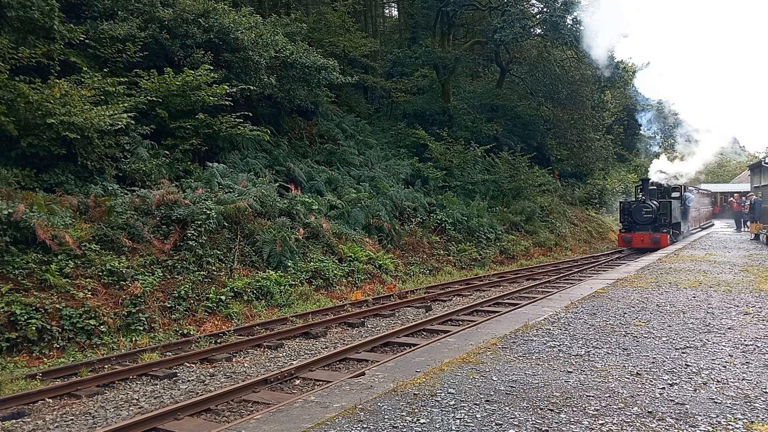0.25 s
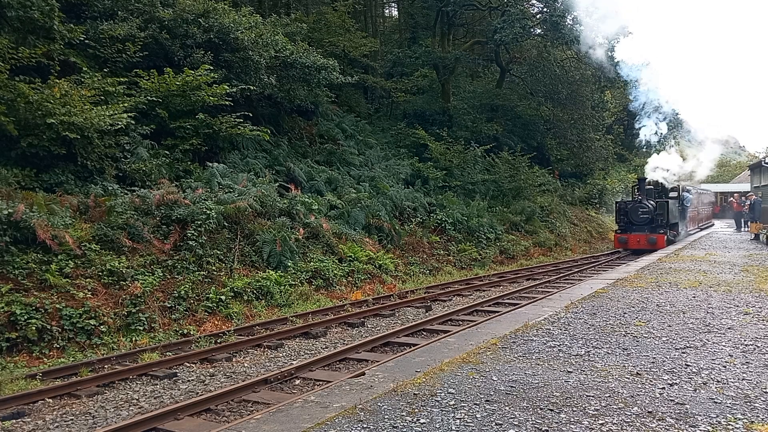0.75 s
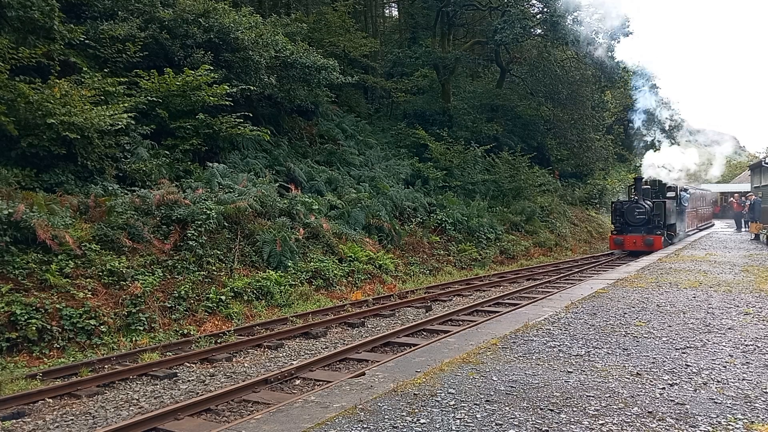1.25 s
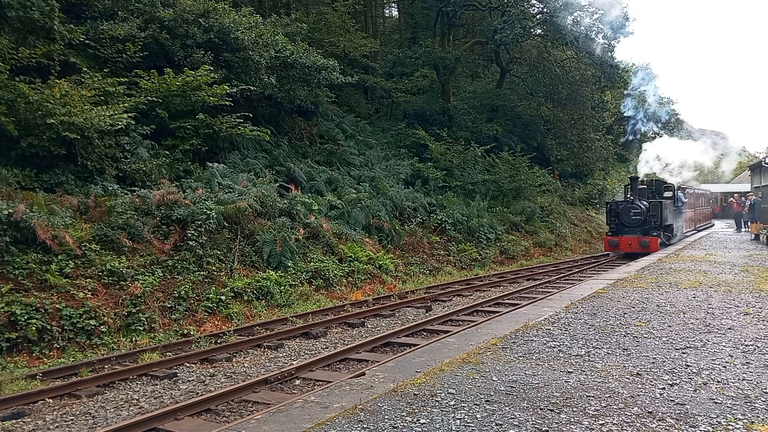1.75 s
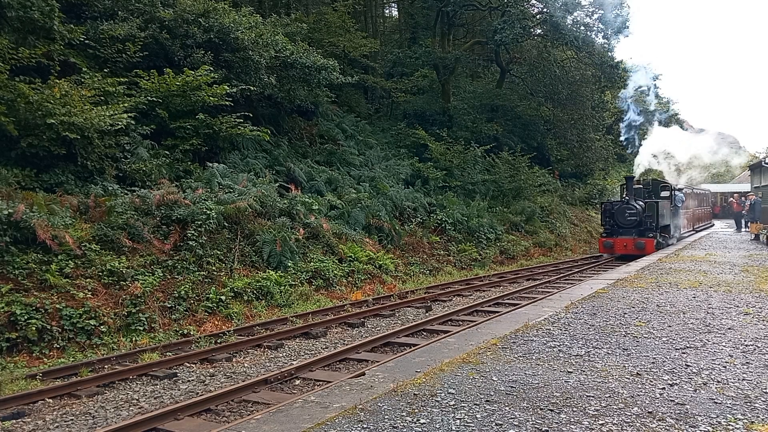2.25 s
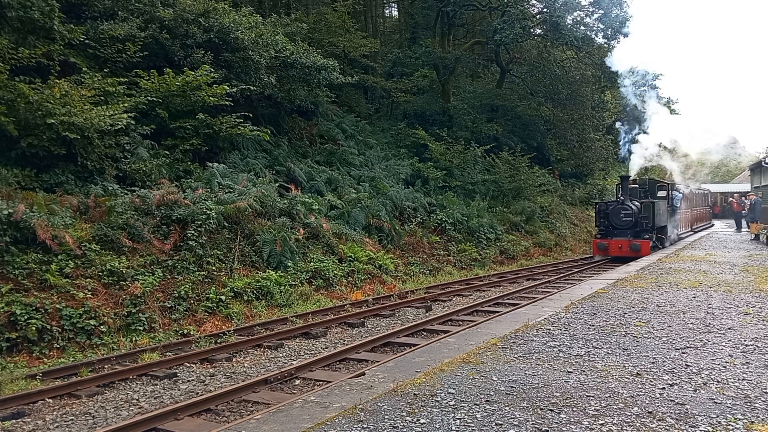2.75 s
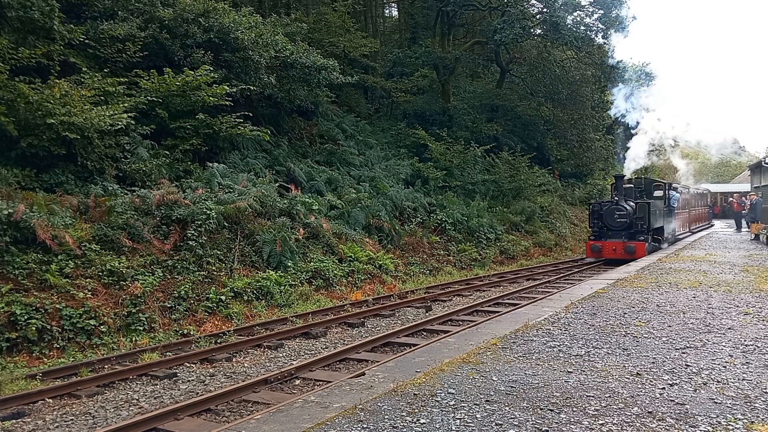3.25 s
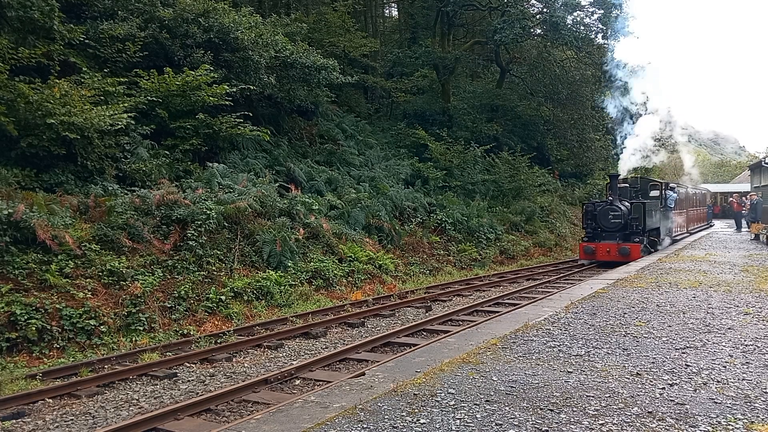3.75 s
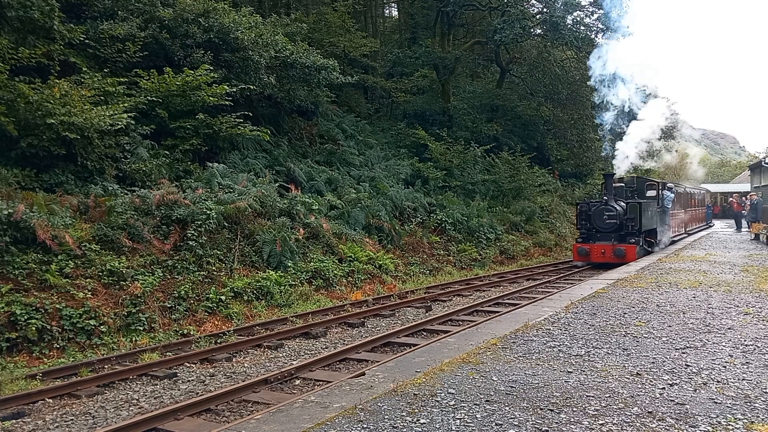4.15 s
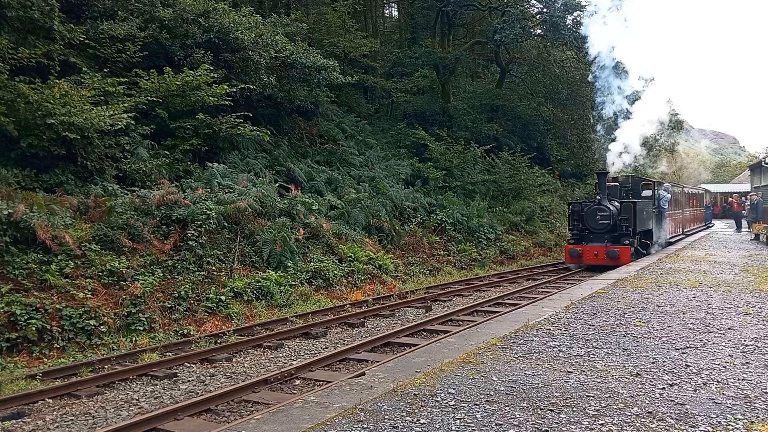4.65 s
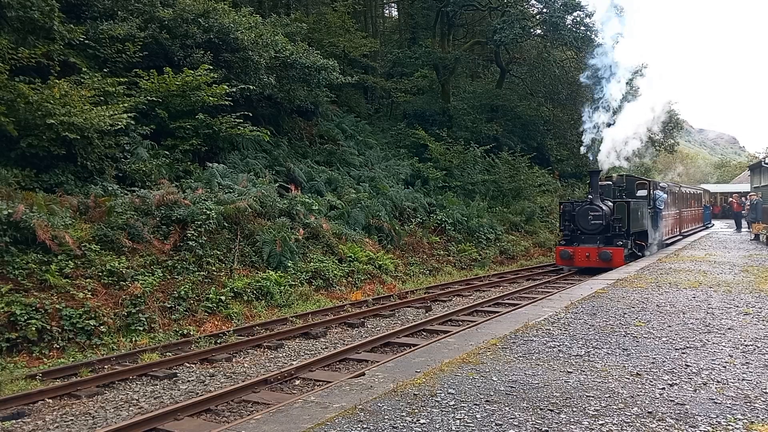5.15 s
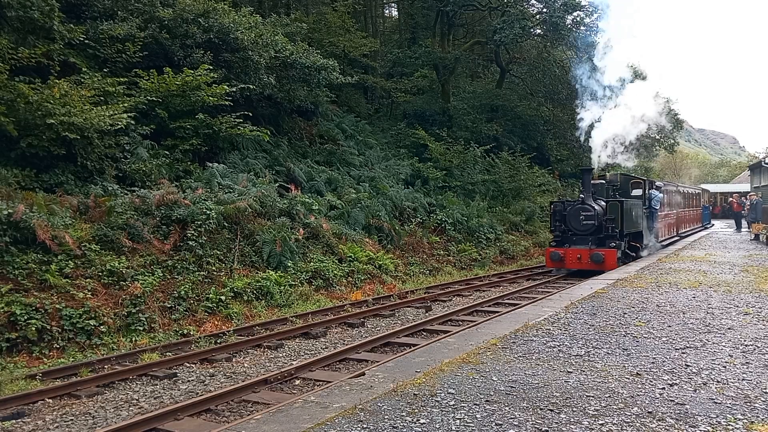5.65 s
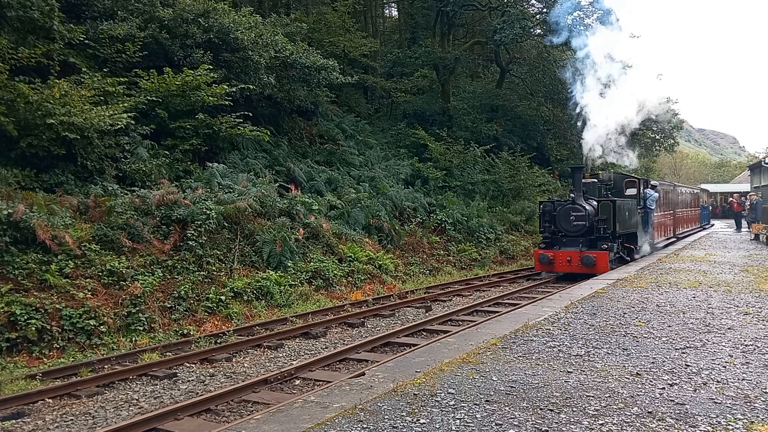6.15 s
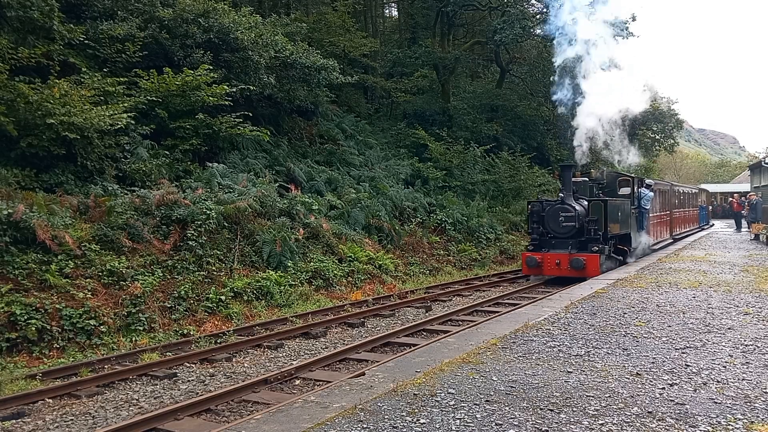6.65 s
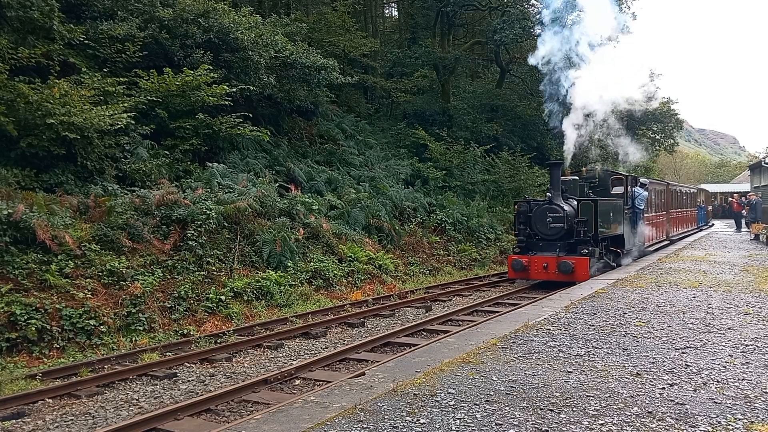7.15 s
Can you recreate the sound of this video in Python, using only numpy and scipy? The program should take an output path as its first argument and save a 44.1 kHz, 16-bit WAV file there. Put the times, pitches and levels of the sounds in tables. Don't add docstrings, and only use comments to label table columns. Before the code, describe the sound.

Outdoors beside the track, a stereo camera microphone hears an approaching small locomotive. Each exhaust beat is a short, rough puff with a low chimney resonance and a woody, diffuse echo. The rhythm tightens steadily as the train gains speed. Underneath lie wheel rumble, draught hum and blower roar; above, thin sizzling and slightly whistling steam leaks. Faint squeaks come first, then soft bassy thumps and brief bright steam spurts.

```python
import sys
import numpy as np
from scipy import signal
from scipy.fft import rfft, irfft, next_fast_len
from scipy.io import wavfile
from scipy.ndimage import uniform_filter1d, map_coordinates

SR = 44100
rng = np.random.default_rng(int(sys.argv[2]) if len(sys.argv) > 2 else 0)


def makeup_ratio(level_db):
    decades = np.asarray(level_db, float) / 20
    return 10 ** decades


def unload_audio(sound):
    columns = np.transpose(np.atleast_2d(sound))
    steps = np.round(np.clip(columns, -1, 1) * 32767)
    wavfile.write(sys.argv[1], SR, steps.astype(np.int16))


N = 325899

# f/Hz, level/dB
SPRAY = [(1200, -24), (1700, 0.5), (2300, 1.5), (3500, -0.5), (5000, -6), (7500, -8), (8500, -19),
         (11000, -26), (15000, -28)]


def unit(x):
    return x / np.sqrt(np.mean(x ** 2, axis=-1, keepdims=True) + 1e-20)


def along(points, hz):
    f, v = np.transpose(points)
    return np.interp(np.log(hz + 1), np.log(f + 1), v)


def wobble(rate):
    knots = rng.standard_normal(int(N * rate / SR) + 4)
    return map_coordinates(knots, [np.arange(N) * rate / SR])


def filtered(x, response):
    n = x.shape[-1]
    m = next_fast_len(n + 4096)
    return irfft(rfft(x, m) * response(np.fft.rfftfreq(m, 1 / SR)), m)[..., :n]


def mode(hz, width):
    return lambda f: (1j * f * width / (hz * hz - f * f + 1j * f * width)) ** 2


def shape(points):
    closed = [(points[0][0] / 2, -120), *points, (points[-1][0] * 2, -120)]
    return lambda f: makeup_ratio(along(closed, f))


def rush(response, patchy_db):
    z = signal.stft(rng.standard_normal((2, N)), nperseg=512)[2]
    field = uniform_filter1d(rng.standard_normal(z.shape[1:]), size=5, axis=0)
    field = uniform_filter1d(field, size=10, axis=1)
    noise = signal.istft(z * makeup_ratio(patchy_db * unit(field)), nperseg=512)[1][:, :N]
    return unit(filtered(noise, response))


def nearness(s):
    start_m, speed_m_s, gain_m_s2 = 45.5, 2.75, 0.15
    return -20 * np.log10(1 - (speed_m_s * s + gain_m_s2 * s ** 2 / 2) / start_m)


def level(far_db, growth, s=None):
    return far_db + growth * nearness(np.arange(N) / SR if s is None else s)


def exhaust():
    # t/s, roar level/dB, lowest chimney mode level/dB, extra spray/dB
    beats = [(-0.054, -31, -27, 2), (0.254, -30.5, -30, 1), (0.543, -33.5, -33, -1.5),
             (0.875, -31, -25.5, -2.5), (1.196, -31, -26, -1), (1.503, -29, -29.5, -5), (1.79, -30, -32, 1),
             (2.103, -28.5, -30.5, 2.5), (2.403, -30.5, -28, 1.5), (2.701, -27, -29.5, 3),
             (2.969, -28.5, -34, 1.5), (3.272, -28, -27, 0.5), (3.551, -28, -36.5, -1),
             (3.829, -25.5, -30, 3), (4.085, -28, -31, 2), (4.383, -26.5, -29.5, 4),
             (4.648, -27.5, -33.5, 0), (4.898, -28, -34, -3), (5.153, -30, -34, -1), (5.44, -27.5, -26, -4),
             (5.705, -28, -25, -5), (5.968, -27.5, -32, -0.5), (6.212, -26.5, -29.5, -3),
             (6.489, -25, -29.5, -4), (6.751, -27, -25.5, 0.5), (7.004, -25.5, -26.5, 0.5),
             (7.245, -30, -31, 0.5)]
    # f/Hz, width/Hz
    chimney = [(242, 42.8), (478, 77), (750, 213), (970, 321), (1280, 240), (1780, 220)]
    # f/Hz, level/dB
    skirt = [(60, -24), (160, -9), (330, -7), (600, -20), (1300, -17), (1550, -31.5), (2200, -16),
             (3000, -41)]
    lead = SR // 8
    out, t = np.zeros((2, N + SR)), np.arange(SR // 5) / SR
    rise = 1 - np.exp(-(t / .022) ** 3)
    dying_breath = makeup_ratio(-16.5 - 60 * t / .3)
    swell = rise * (np.exp(-(t / 0.066) ** 6.5) + dying_breath)
    first, second, third, fourth, fifth, top = [mode(*m) for m in chimney]
    for s, roar_db, boom_db, spit_db in beats:
        tumble = makeup_ratio(1.32 * map_coordinates(rng.standard_normal(40), [t * 120]))
        jets = rng.standard_normal((5, 2, len(t))) * swell * tumble
        jets[3] *= swell ** 0.29
        jets[4] *= swell ** 0.41 * tumble
        fifth_gain, top_gain = makeup_ratio(level(-3.7, -3.5, s)), makeup_ratio(level(-13, 0.6, s))
        roar = lambda f: fourth(f) + fifth_gain * fifth(f) + top_gain * top(f) + shape(skirt)(f)
        voices = [(roar, roar_db), (first, boom_db - .5), (second, level(-30.5, -1.05, s)),
                  (third, level(-45.5, 3.46, s)), (shape(SPRAY), level(-45, 0.37, s) + spit_db)]
        puff = 0
        for jet, (colour, level_db) in zip(jets, voices):
            puff = puff + makeup_ratio(level_db) * unit(filtered(jet, colour))
        puff = bank(puff, wet_db=-10.5)
        start = lead + round((s - .025) * SR)
        out[:, start:start + puff.shape[1]] += makeup_ratio(-3.0) * puff
    return out[:, lead:lead + N]


def bank(x, wet_db):
    # f/Hz, time to fall 60 dB/s
    decay = [(150, 0.39), (500, 0.48), (1000, 0.22), (3000, 1), (8000, 0.12)]
    hz, t, z = signal.stft(rng.standard_normal((2, SR // 3)), SR, nperseg=256)
    tail = signal.istft(z * makeup_ratio(-60 * t / along(decay, hz)[:, None]), SR, nperseg=256)[1]
    delayed = np.pad(x, ((0, 0), (900, 0)))
    late = signal.fftconvolve(delayed, tail / np.linalg.norm(tail[0]), axes=1)
    late *= makeup_ratio(wet_db)
    late[:, :x.shape[1]] += x
    return late


def spurts():
    # t/s, level/dB, time to fall 60 dB/s
    spits = [
        (.93, -41, 0.36),
        (1.56, -43, 0.49),
        (3.57, -37, 0.27),
        (4.9, -30.5, 0.51),
        (5.445, -29, 0.11),
        (6.501, -29.5, 0.16),
    ]
    t, gain = np.arange(N) / SR, np.zeros(N)
    for s, db, t60 in spits:
        age = np.maximum(t - s, 0)
        gain += makeup_ratio(db - 60 * age / t60) * (1 - np.exp(-age / 0.002))
    return gain * unit(filtered(rng.standard_normal((2, N)), shape(SPRAY)))


def joints():
    # t/s, peak level/dB, f/Hz
    thumps = [
        (2.932, -11, 160),
        (3.211, 1, 114),
        (4.072, -4.5, 135),
        (4.599, -43, 102),
        (5.099, -6, 83),
        (5.321, -8, 90),
        (6.548, -8, 155),
        (7.122, -5, 119),
    ]
    out, t = np.zeros(N + SR), np.arange(SR // 5) / SR
    for s, db, hz in thumps:
        ring = np.sin(2 * np.pi * hz * t) * makeup_ratio(-60 * t / 0.083)
        ring += 0.41 * np.sin(2 * np.pi * 1.7 * hz * t) * makeup_ratio(-60 * t / 0.12)
        out[round(s * SR):][:len(t)] += makeup_ratio(db - 3.5) * ring * (1 - np.exp(-t / 0.026))
    return out[:N]


def leaks():
    # f/Hz, level/dB
    broad = [(1500, -30), (2600, -10.5), (4200, -6.5), (5300, -7.5), (6100, -5.5), (7000, -11.5),
             (8100, -4.5), (8500, -15), (8800, -40)]
    sizzle = [(10250, -45), (10450, -6), (10900, 0), (11800, -1), (13000, -2.5), (14500, -6), (15400, -9)]
    trough = [(8200, -30), (8450, 0), (8900, -1.5), (9300, 0), (10100, 0), (10500, -2), (10700, -30)]
    # f/Hz, width/Hz, first level/dB, last level/dB
    nozzles = [(5648, 55, -7.5, -12.5), (6574, 260, -10, -10), (7414, 620, -2, -3.5),
               (5293, 360, -8.5, -10)]
    hiss = rush(shape(broad), patchy_db=2.0)
    hiss += makeup_ratio(level(-7.5, 0.57)) * rush(shape(sizzle), patchy_db=2.0)
    hiss += makeup_ratio(level(-14, -0.3)) * rush(shape(trough), patchy_db=6.5)
    for hz, width, first_db, last_db in nozzles:
        whistle = unit(filtered(rng.standard_normal((2, N)), mode(hz, width)))
        hiss += makeup_ratio(np.linspace(first_db, last_db, N) + 1.46 * wobble(1.955)) * whistle
    return makeup_ratio(level(-46.5, 0.92) + .4 * wobble(4.85)) * hiss


def rumble():
    # f/Hz, level/dB
    wheel_colour = [(25, -38), (45, -28.5), (62, -5.5), (110, -2), (200, -9.5), (330, -14), (420, -55)]
    roar_colour = [(200, -7.5), (350, -2.5), (600, -4), (1050, -6), (1400, -12), (2000, -12), (2800, -21),
                   (4000, -26), (6000, -28)]
    # t/s, level/dB
    pull = [
        (0, -46),
        (2.3, -41.5),
        (2.84, -51.5),
        (3.38, -36.5),
        (4.14, -46),
        (4.51, -37.5),
        (5.02, -41),
        (6.24, -43.5),
        (6.75, -36),
    ]
    draught_db = np.interp(np.arange(N) / SR, *np.transpose(pull))
    wheels = makeup_ratio(level(-40.5, 0.85) + .9 * wobble(11)) * rush(shape(wheel_colour), patchy_db=2.5)
    hum = unit(filtered(rng.standard_normal((2, N)), mode(240.6, 37)))
    draught = makeup_ratio(draught_db + 1.4 * wobble(6.6)) * hum
    blower = makeup_ratio(level(-42.5, 0.71) + 0.41 * wobble(21)) * rush(shape(roar_colour), patchy_db=1)
    return wheels + draught + blower


def squeak():
    # t/s, length/s, third partial level/dB, higher partials against it/dB, pitch f/Hz
    grips = [
        (.5, .07, -51, -18, 453),
        (.8, .1, -48, -18, 454),
        (.96, .1, -58, 2, 459),
        (1.09, .12, -44, -10, 455),
        (1.22, .08, -49, -5, 450),
        (1.4, .2, -48, -12, 457),
        (1.65, .16, -62, 7, 452),
    ]
    s, length, db, higher_db, pitch_hz = np.transpose(grips)[..., None]
    t = np.arange(N) / SR
    pitch = np.interp(t, s[:, 0], pitch_hz[:, 0]) + 1.5 * wobble(30)
    phase = 2 * np.pi * np.cumsum(pitch) / SR
    grip = np.exp(-(2 * (t - s) / length) ** 4 / 2)
    third = (makeup_ratio(db) * grip).sum(axis=0)
    higher = (makeup_ratio(db + higher_db) * grip).sum(axis=0)
    partials = [(3, third), (4, higher), (5, makeup_ratio(8) * higher)]
    return sum(gain * makeup_ratio(2.5 * wobble(25)) * np.sin(k * phase) for k, gain in partials)


def ports(pair):
    # t/s, lag/samples
    left_lag = [(0, 8.53), (4, 7.77), (5.5, 7.3), (7.39, 5.76)]
    # f/Hz, share of that lag
    lag_share = [(100, .35), (400, .4), (650, .5), (900, .75), (1300, 1)]
    # f/Hz, likeness of the ports from 0 to 1
    alike = [(30, .9), (120, .993), (250, .985), (500, .94), (900, .86), (1400, .74), (2500, .58),
             (6000, .58), (9000, .6), (13000, .45)]
    # f/Hz, left minus right level/dB
    lean = [(60, -1.5), (120, -0.5), (240, -1.5), (480, -0.5), (950, -1), (1890, 2.5), (3760, -2.5),
            (7500, 2.5), (15000, -4)]
    hz, t, (common, other) = signal.stft(pair, SR, nperseg=1024)
    turn = np.arccos(np.clip(along(alike, hz), 0, 1))[:, None] / 2
    lag = np.interp(t, *np.transpose(left_lag)) / SR
    late = np.exp(-1j * np.pi * (hz * along(lag_share, hz))[:, None] * lag)
    late = late * makeup_ratio(along(lean, hz) / 2)[:, None]
    common, other = np.cos(turn) * common, np.sin(turn) * other
    both = np.array([(common + other) * late, (common - other) / late])
    return signal.istft(both, SR, nperseg=1024)[1][:, :N]


def scene():
    pair = exhaust() + spurts() + leaks() + rumble()
    pair[0] += joints() + squeak()
    return ports(pair)


def low_pass(x):
    return signal.sosfilt(signal.butter(12, 15560, fs=SR, output="sos"), x)


def record(dry):
    band = filtered(dry, lambda hz: (hz < 15520) * hz ** 2 / (hz ** 2 + 22 ** 2))
    return low_pass(band)


dry = scene()
out = record(dry)
unload_audio(out)
```